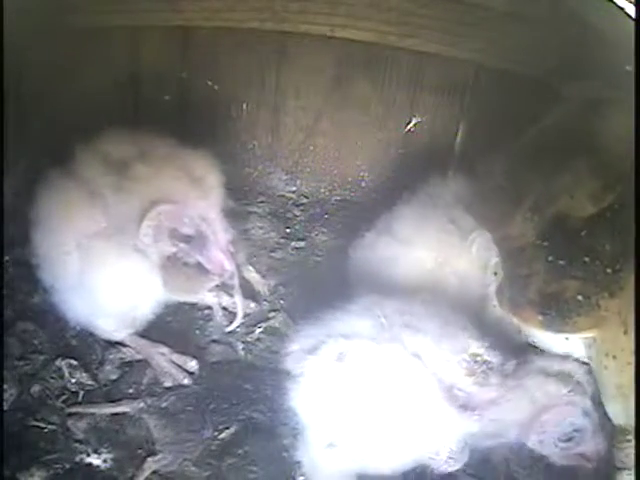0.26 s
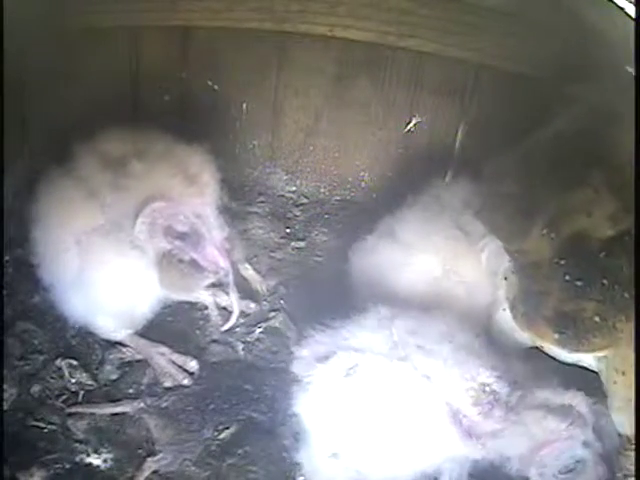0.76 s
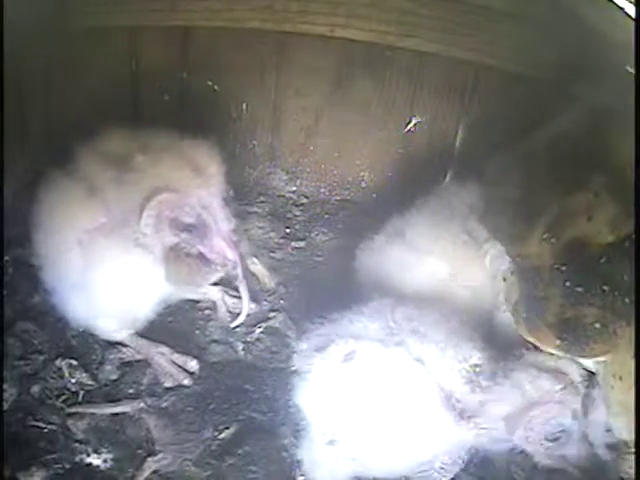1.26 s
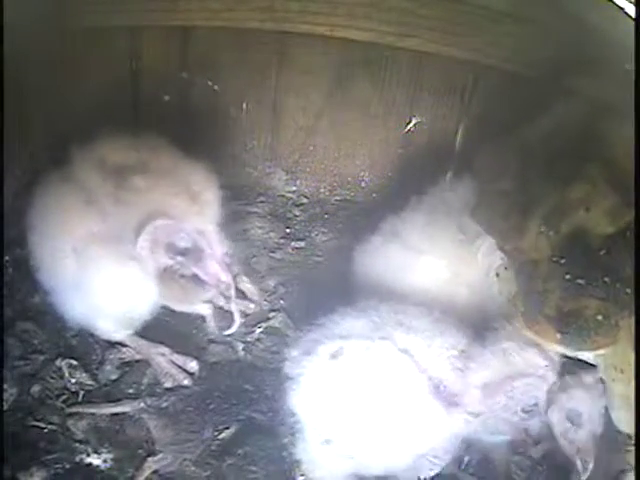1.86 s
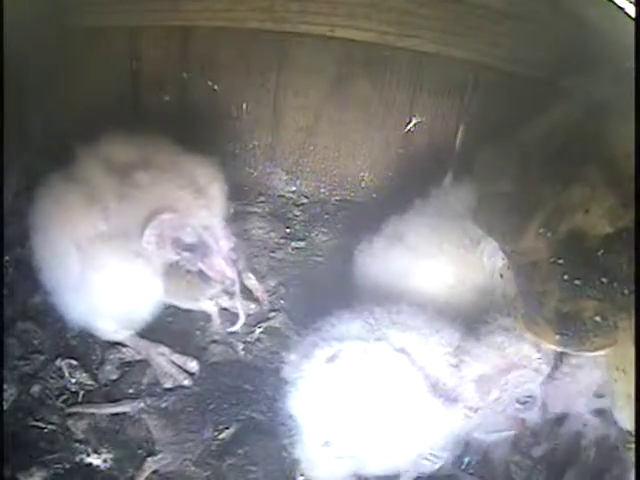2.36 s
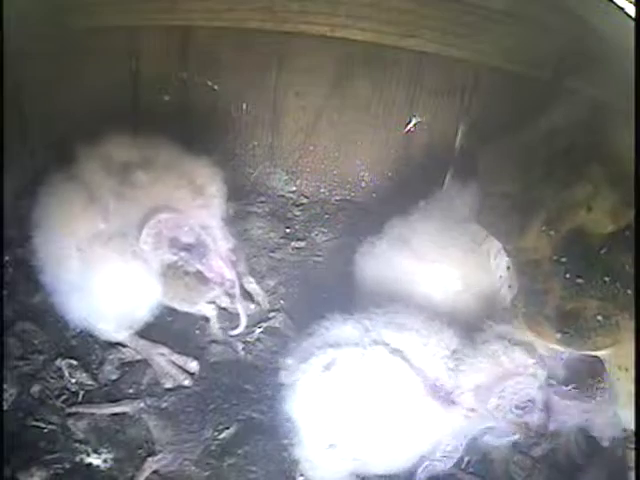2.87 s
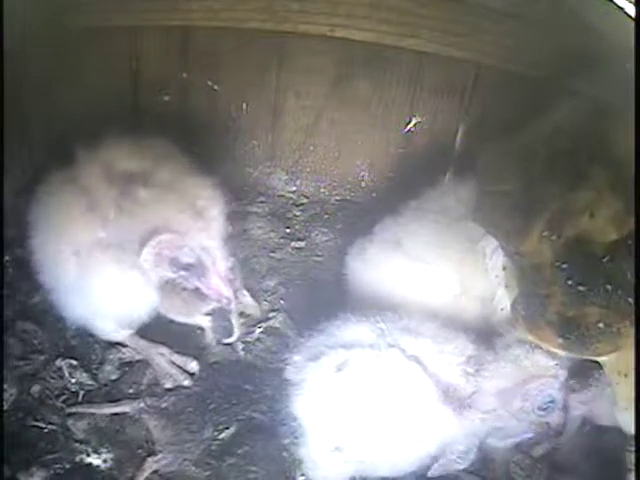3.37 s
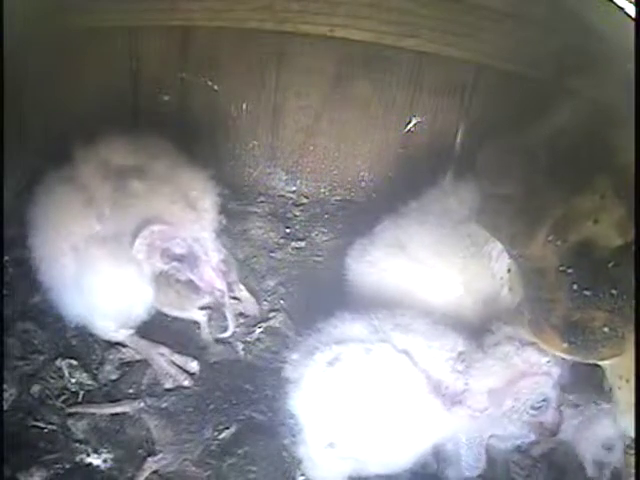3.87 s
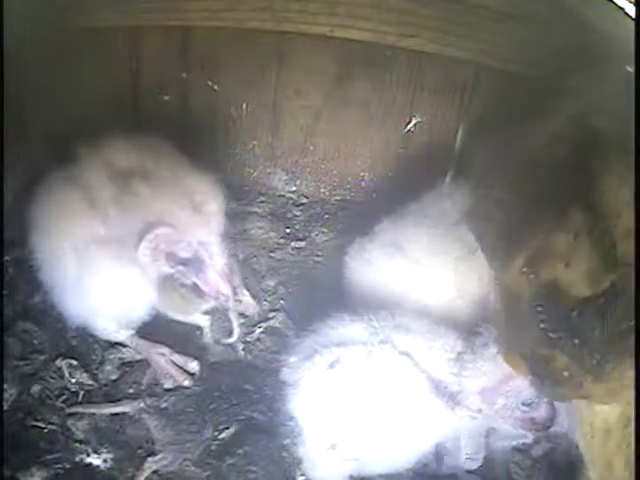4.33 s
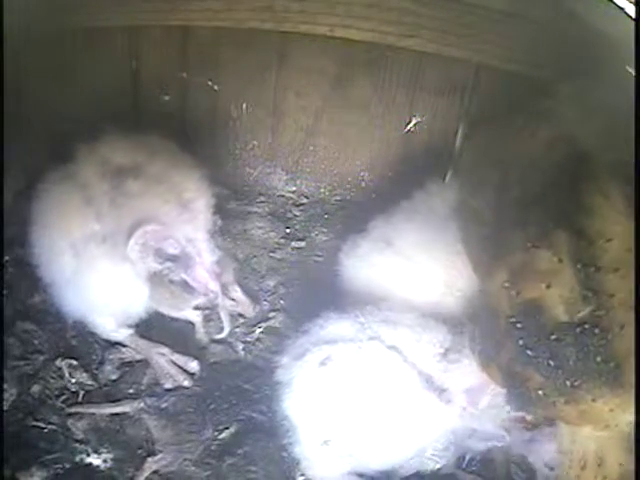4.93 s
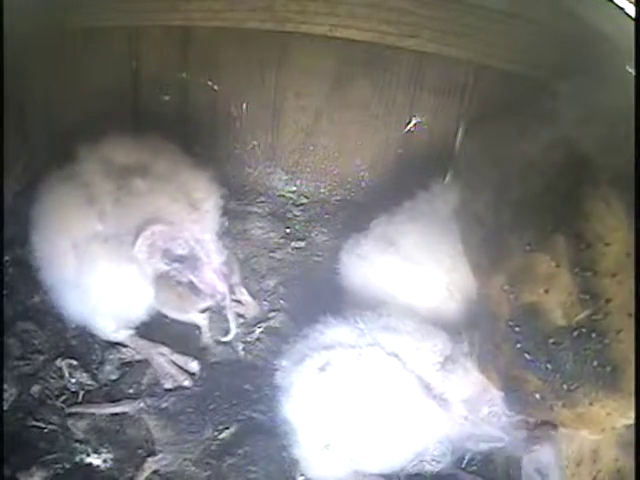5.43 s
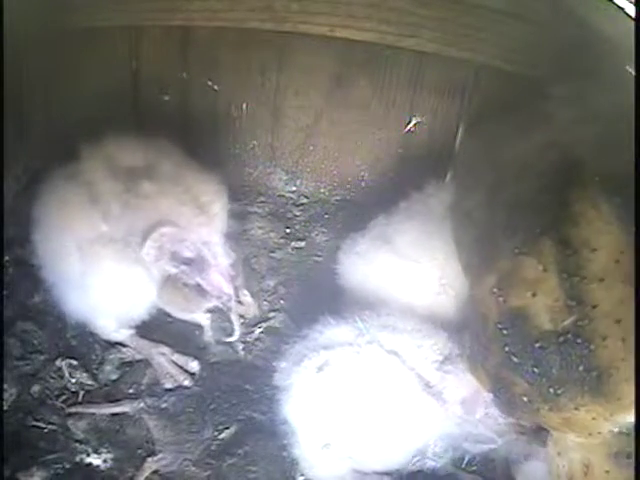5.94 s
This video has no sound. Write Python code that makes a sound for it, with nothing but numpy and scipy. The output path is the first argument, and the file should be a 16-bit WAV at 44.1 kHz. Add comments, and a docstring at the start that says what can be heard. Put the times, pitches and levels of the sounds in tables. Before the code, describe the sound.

A close, lo-fi microphone in a small wooden nest box, heard almost entirely on the left, with only very faint hum and hiss on the right. A steady 60-per-second electrical buzz, thin whine and faint box air continue throughout. A young owl begs with rasping, snore-like hisses, bright around 4.5 kHz with a throaty layer near 2 kHz. They run about 0.3-0.75, 1.1-1.55 and 1.95-2.4 seconds, swelling and then shutting with a short falling squeak. Small mouth pops click at 1.8, 1.95 and 2.7. The loudest, lower hiss lasts from 2.7 to 3.2, with a soft floor thump at 2.9. A scarcely audible puff comes at 3.35 and a pop at 3.4. Further hisses follow at 3.6-3.95, 4.45-4.9 and a thinner one at 5.25-5.65, ending in a clearer squeak. Another starts at 6.03, still rising when the sound ends.

```python
"""Owlet begging in a nest box

An owlet begs with long hisses: noise shaped by windpipe, beak and box resonances. Its half-closed windpipe
squeaks, in gliding sines, as it opens and shuts. Mouth pops and floor bumps are short decaying tones.
A camera's picture signal buzzes in the microphone lead as a train of dips, beside a faint whine and box air.
All this is on the left; the open right input holds faint hum, pulses and hiss, with a trace of the left.
"""
import sys
import numpy as np
from scipy import signal
from scipy.fft import rfft, irfft, next_fast_len
from scipy.io import wavfile
from scipy.ndimage import uniform_filter1d, map_coordinates

SR = 44100
rng = np.random.default_rng(int(sys.argv[2]) if len(sys.argv) > 2 else 0)


def voltage_ratio(decibels):
    """Convert decibels (scalar or array-like) to amplitude ratios, 20 dB per decade."""
    exponent = np.asarray(decibels, float) / 20
    return 10 ** exponent


def persist_wave(psi):
    """Save psi, clipped to +-1, as 16-bit WAV."""
    counts = np.round(np.clip(psi, -1, 1) * 32767).astype(np.int16)
    wavfile.write(sys.argv[1], SR, np.atleast_2d(counts).T)


N = 273420
T = np.arange(N) / SR  # s

# the begging hisses, one list each: (time [s], effort as level of the main mode [dB],
# narrowing as throat mode over main mode [dB], throat mode [Hz], beak opening as treble over main mode [dB])
HISS_PATHS = [
    [(0.295, -54, -7, 1770, -15), (0.307, -62, 8.5, 1960, 3), (0.355, -33.5, -15.5, 1950, -5.5),
     (0.487, -25.5, -15.5, 2000, -6), (0.667, -26, -11.5, 1930, -5.5), (0.699, -27.5, -10, 2220, -8),
     (0.733, -40, 3.5, 2140, -2), (0.765, -58, 3, 1810, 8.5)],
    [(1.127, -56, 3, 1970, -7.5), (1.167, -41.5, -11, 1960, 2), (1.267, -31.5, -13, 1970, -4),
     (1.409, -25, -10.5, 2070, -6.5), (1.485, -27, -4, 1980, -8.5), (1.501, -29.5, -8.5, 2110, -6.5),
     (1.523, -39, 6, 2180, -4.5), (1.553, -48, 13, 1980, -10.5)],
    [(1.948, -59.5, 17, 1860, -5), (2.004, -36.5, -5, 1990, -2.5), (2.078, -35.5, 0.5, 1920, -1),
     (2.152, -29.5, -2.5, 2120, -5.5), (2.262, -27.5, -2.5, 1990, -2.5), (2.326, -28.5, -2, 2120, -13),
     (2.372, -39, 3.5, 2050, -10.5), (2.398, -59.5, 9, 1850, -8)],
    [(2.722, -45, 6, 2000, -0.5), (2.732, -42, -8.5, 2140, -5.5), (2.856, -29.5, -16.5, 1620, -5.5),
     (2.964, -19.5, -15, 1600, -14), (3.092, -21, -17, 1690, -11), (3.164, -33, -8.5, 1730, -7.5),
     (3.21, -44, 4.5, 1820, -6), (3.222, -56, 13, 1690, 5)],
    [(3.325, -74.5, 17, 2060, -8.5), (3.335, -70, 6, 2040, -2), (3.343, -73.5, 12, 2000, 3.5),
     (3.353, -66, -2, 1910, -0.5), (3.365, -72, 8, 1840, -2), (3.37, -89, 12, 1830, -0.5)],
    [(3.577, -65, 9, 2080, -9.5), (3.587, -65.5, 4, 2120, -0.5), (3.631, -42, -6.5, 2000, 1),
     (3.663, -37.5, -12, 1950, -1), (3.819, -31, -3.5, 2130, -3), (3.827, -27.5, -8, 2190, -5),
     (3.915, -31, -0.5, 2300, -5), (3.975, -62.5, 24.5, 1960, -1.5)],
    [(4.44, -60, -16, 2060, 18), (4.468, -48, -5, 2110, -7.5), (4.51, -50.5, 7, 1810, -3.5),
     (4.674, -32.5, -7.5, 1880, -1), (4.73, -30, 0.5, 2150, -13.5), (4.822, -35, -1.5, 2130, -6.5),
     (4.88, -50, 16, 1960, -8.5), (4.885, -71.5, 24.5, 1890, -4)],
    [(5.242, -75, 26.5, 2060, -2.5), (5.286, -47.5, 9, 2030, 6.5), (5.354, -38, -0.5, 2100, 3),
     (5.444, -33, -1, 2100, 0.5), (5.508, -34, -0.5, 2110, 5), (5.598, -30, -4.5, 2200, -4),
     (5.618, -42, 11, 2220, 0.5), (5.645, -55.5, 16, 2000, -2.5)],
    [(6.03, -72, 5, 2100, 16.5), (6.042, -48.5, -26, 2050, -1.5), (6.048, -44, 1, 2050, -15),
     (6.054, -54.5, 6.5, 2010, -1), (6.092, -45.5, -3.5, 2000, 2), (6.134, -42, 0, 1850, 5.5),
     (6.19, -35.5, -3, 1960, -5), (6.2, -31.5, -4, 1960, -0.5)],
]
# further tone colour, one row per hiss: (shoulder below the main mode [dB], shoulder above it [dB],
# turn away from the wall [about 0-1], lift of the box's low mode [dB], top octave [dB])
HISS_COLOURS = [(-8, -12, 0, 0, -3.5), (-11.5, -7, -.1, -0.5, -0.5), (-1, -15, -.1, 3.5, -2),
                (-7, -33.5, 0.96, 2.5, -5), (-2, -12, 0.3, 9, -0.5), (-6.5, -5, 0, 3, -3),
                (-10.5, -16, 0.14, 7, 0), (-2.5, -11, 0.35, 6, -2.5), (-29, -17.5, 0.2, 5.5, -2)]
# squeaks as the windpipe shuts: (time [s], length [s], first pitch [Hz], level [dB], step per overtone [dB])
SHUTTING_SQUEAKS = [(0.746, 0.019, 2120, -34.5, -13.5), (1.551, .013, 1946, -36, -18),
                    (2.38, 0.014, 2050, -32, -9), (3.204, 0.017, 2026, -35.5, -28),
                    (3.959, 0.031, 2160, -32.5, -26), (4.873, 0.0202, 2070, -37, -29),
                    (5.632, 0.011, 2250, -25.5, -23)]


def unit(x):
    """Scale to rms 1."""
    return x / np.sqrt(np.mean(np.abs(x) ** 2) + 1e-20)


def along(points, hz):
    """Turn (frequency [Hz], level [dB]) points into gains, interpolated on a log frequency axis."""
    point_hz, point_db = np.transpose(points)
    return voltage_ratio(np.interp(np.log(hz + 1), np.log(point_hz + 1), point_db))


def wobble(rate):
    """A smooth random curve through `rate` knots a second."""
    knots = rng.standard_normal(int(N * rate / SR) + 4)
    return map_coordinates(knots, [T * rate])


def filtered(x, response):
    """Multiply the spectrum of x by a response of frequency."""
    size = next_fast_len(N + SR // 4)
    spectrum = rfft(x, size) * response(np.fft.rfftfreq(size, 1 / SR))
    return irfft(spectrum, size)[:N]


def noise(spectrum):
    """Steady noise of rms 1 with the given spectrum."""
    return unit(filtered(rng.standard_normal(N), lambda f: along(spectrum, f)))


def mode(f, hz, width):
    """Complex response of one resonance."""
    return 1j * f * width / (hz * hz - f * f + 1j * f * width)


def bell(f, hz, width):
    """A bell curve of height 1 over frequency."""
    return np.exp(-.5 * ((f - hz) / width) ** 2)


def power(response):
    """Power of a response, scaled to a mean of 1 over frequency."""
    squared = np.abs(response) ** 2
    return squared / np.mean(squared, axis=0)


def fixed_modes(f, modes):
    """Power of resonances that sum with alternating sign, as neighbouring modes of a cavity can."""
    total = sum((-1) ** k * voltage_ratio(db) * mode(f, hz, width) for k, (hz, width, db) in enumerate(modes))
    return power(total ** 1.174)


def hiss_progress(t):
    """Index of the current hiss, and how far it has run from 0 to 1."""
    starts = [path[0][0] - .02 for path in HISS_PATHS]
    which = np.clip(np.searchsorted(starts, t) - 1, 0, None)
    first, last = np.transpose([(path[0][0], path[-1][0]) for path in HISS_PATHS])[:, which]
    return which, np.clip((t - first) / (last - first), 0, 1)


def hiss_colour(f, t, which, progress):
    """Power spectrum of the rushing air through moving windpipe modes and fixed resonances; main mode in Hz."""
    # voice, one row per hiss: (main mode [Hz], its width [Hz],
    # then levels against it: bottom [dB], third mode [dB], top [dB])
    voices = [(4560, 180, -8.5, -5, -5), (4537, 350, -8, -1.5, -6), (4650, 230, -10.5, -4.5, -3.5),
              (4620, 270, -10, 1, -14), (4550, 280, -19, -1, -22), (4504, 390, -11, -1.5, -5),
              (4520, 400, -12, -2.5, -5), (4260, 560, -11, -1, -6.5), (4560, 290, -10, -2.5, -5.5)]
    # fixed resonances that the hiss excites, bottom, third and top: (frequency [Hz], width [Hz], level [dB])
    bottom_modes = [(620, 350, -7), (1080, 250, -1), (1370, 200, 0)]
    third_modes = [(5900, 120, -8), (6714, 460, 4)]
    top_modes = [(8145, 220, 4), (9370, 487, 0.5), (10080, 290, 5), (11500, 990, -4.5)]
    # broad rush between the modes: (frequency [Hz], relative level [dB])
    rush_spectrum = [(300, -47.5), (500, -12.5), (2000, -2), (3400, 1.5), (5500, -3.5), (8000, -2.5),
                     (11000, -34), (12500, -34), (14000, -34), (15700, -18.5)]
    reference_effort_db = -30
    rush_db, rush_growth = 4, .25  # level against the top modes; dB gained per dB of effort
    sag_hz, wander_hz = 120, 45  # the main mode sinks through a hiss and wanders
    # how bottom, third and top follow: dB per dB of (narrowing, effort, beak opening)
    laws = [(0.23, -0.57, .1), (.05, -.05, 0.97), (-0.015, 0.085, 1)]

    s, main_db, *columns = np.concatenate(HISS_PATHS).T
    effort_db = np.interp(t, s, main_db - reference_effort_db)
    throat_db, throat_hz, beak_db = [np.interp(t, s, column) for column in columns]
    main_hz, width_hz, *layers_db = np.transpose(voices)[:, which]
    bottom_db, third_db, top_db = [
        db + a * throat_db + b * effort_db + c * beak_db for db, (a, b, c) in zip(layers_db, laws)]
    below_db, above_db = np.transpose(HISS_COLOURS)[:2, which]
    main_hz = main_hz - sag_hz * (progress - .5) + wander_hz * np.interp(t, T, wobble(12))

    # powers of the modes steepen their skirts
    main = power(mode(f, main_hz, width_hz) ** 2.5)
    throat = voltage_ratio(throat_db) ** 2 * power(mode(f, throat_hz, 1100) ** 3.2)
    below = voltage_ratio(below_db) ** 2 * power(mode(f, 4206, 600) ** 1.1)
    above = voltage_ratio(above_db) ** 2 * power(mode(f, 5035, 340) ** 5.4)
    bottom = voltage_ratio(bottom_db) ** 2 * fixed_modes(f, bottom_modes)
    third = voltage_ratio(third_db) ** 2 * fixed_modes(f, third_modes)
    rush = voltage_ratio(rush_db + rush_growth * effort_db) ** 2 * power(along(rush_spectrum, f))
    top = voltage_ratio(top_db) ** 2 * (fixed_modes(f, top_modes) + rush)
    return main + throat + below + above + bottom + third + top, main_hz


def fine_colour_db(f, which, progress, main_hz):
    """Fixed peaks and dips, wall echoes, tone colour of each hiss and a drifting fine ripple, in dB."""
    # fixed peaks and dips of the hiss spectrum, with weak treble around 13 kHz:
    # (frequency [Hz], width [Hz], level [dB])
    fixed_bands = [(1950, 350, 0.5), (2582, 43, 4.5), (3550, 40, 4), (4763, 14, 7), (2153, 46, -11),
                   (8520, 160, 0.5), (9400, 140, -1), (10740, 150, -5), (13300, 700, -7.5)]
    # bands where a wall echo meets the direct sound, mostly cancelling it:
    # (frequency [Hz], width [Hz], level facing the wall [dB], level turned away [dB])
    echo_bands = [(876, 39, -10, -19.5), (1560, 77, -5.5, 1.5), (3200, 120, 2.5, -15.5),
                  (5760, 190, 1, -6.5), (7260, 210, 0, -12.5)]
    hollow_hz, hollow_width_hz, hollow_db = 3347, 330, -6  # gap between throat and main mode

    turn, body_db, octave_db = np.transpose(HISS_COLOURS)[2:, which]
    fixed = sum(db * bell(f, hz, width) for hz, width, db in fixed_bands)
    echoes = sum((facing + (away - facing) * turn) * bell(f, hz, width)
                 for hz, width, facing, away in echo_bands)
    hollow = hollow_db * (1 - progress) ** 1.9 * bell(f, hollow_hz, hollow_width_hz)  # deepest at the start
    body = body_db * bell(f, 650, 130)
    octave = octave_db * np.clip(f / 3000 - 3, 0, 1)  # comes in from 9 to 12 kHz
    # fine peaks and dips that drift over time
    ripple = rng.standard_normal((len(f), len(main_hz)))
    ripple = uniform_filter1d(ripple, size=2, axis=0)
    ripple = unit(uniform_filter1d(ripple, size=70, axis=1))
    ripple_share = 1 - .8 * bell(f, main_hz, 350)  # the fine ripple is shallower around the main mode
    return fixed + echoes + hollow + body + octave + 3.1 * ripple_share * ripple


def hiss_level_db(t, progress):
    """Effort sets the loudness while the folds flutter, flap and briefly close."""
    # brief closures of the windpipe near the start or end of a hiss: (time [s], length [s], level [dB])
    closures = [(.742, 0.0037, -8), (1.534, 0.003, -8), (1.542, 0.0029, -19.5), (2.377, 0.0031, -15.5),
                (3.19, 0.0046, -10), (4.448, 0.026, -9), (4.473, 0.0051, -8), (4.837, 0.005, -14.5),
                (4.860, 0.0085, -21), (6.054, 0.015, -8.5)]
    flap_hz, flap_db = 170, 3  # the tiring folds flap: mean rate, depth reached at the end of a hiss
    shut_db = -5  # the air thins while the shutting folds sing

    s, main_db = np.concatenate(HISS_PATHS).T[:2]
    level_db = np.interp(T, s, main_db) - .8 + 0.13 * wobble(140) + 0.89 * wobble(30)
    flap = np.sin(2 * np.pi * np.cumsum(flap_hz * (1 + .2 * wobble(25))) / SR)
    level_db = level_db + flap_db * np.interp(T, t, progress) ** 4 * flap
    thinnings = [(start + length / 2, length, shut_db) for start, length, *_ in SHUTTING_SQUEAKS]
    for centre, length, db in closures + thinnings:
        level_db = level_db + db * np.exp(-((T - centre) / length * 2) ** 4)
    return level_db


def hiss():
    """Turbulent air is broadband noise, coloured by windpipe, beak and box and driven by the bird's effort."""
    f, t, frames = signal.stft(rng.standard_normal(N), SR, nperseg=512, noverlap=384)
    f = f[:, None]
    frames = unit(frames)
    which, progress = hiss_progress(t)
    colour, main_hz = hiss_colour(f, t, which, progress)
    shape = np.sqrt(colour) * voltage_ratio(fine_colour_db(f, which, progress, main_hz))
    air = signal.istft(frames * shape, SR, nperseg=512, noverlap=384)[1][:N]
    air = air / np.std(signal.istft(frames, SR, nperseg=512, noverlap=384)[1])
    gate = 0
    for path in HISS_PATHS:
        rise = (T - path[0][0]) / .0015
        fall = (path[-1][0] - T) / 0.012 + .5
        gate = gate + np.clip(np.minimum(rise, fall), 0, 1)
    return air * voltage_ratio(hiss_level_db(t, progress)) * gate


def squeaks():
    """The narrowing folds sing a short falling note with overtones."""
    # squeaks as the windpipe opens:
    # (time [s], length [s], first pitch [Hz], level [dB], step per overtone [dB])
    openings = [(.287, .011, 4860, -48.5, -13), (1.114, 0.016, 4700, -57, -30),
                (1.931, 0.017, 5100, -57.5, 0), (3.565, .011, 4550, -47, -34),
                (4.457, .022, 4570, -44.5, -12), (5.224, 0.018, 5140, -59, 1),
                (6.019, 0.0098, 4940, -58, 2.5), (6.041, 0.011, 4950, -42, -8)]
    open_hz, shut_share = 4250, 0.81  # last pitch when opening; last over first pitch when shutting
    open_bend, shut_bend = 2.2, .9  # power of time in the glide: a late fall, an almost even fall

    notes = [(*row, open_hz, open_bend) for row in openings]
    notes += [(*row, row[2] * shut_share, shut_bend) for row in SHUTTING_SQUEAKS]
    out = np.zeros(N + SR)
    for s, length, first_hz, db, slope_db, last_hz, bend in notes:
        u = np.linspace(0, 1, round(length * SR))
        phase = 2 * np.pi * np.cumsum(first_hz + (last_hz - first_hz) * u ** bend) / SR
        note = 0
        for k in range(5):
            if (k + 1) * first_hz < 11000:
                note = note + voltage_ratio(k * slope_db) * np.sin((k + 1) * phase)
        out[round(s * SR):][:len(u)] += voltage_ratio(db) * np.sin(np.pi * u) ** .6 * note
    return out[:N]


def knocks(events, cycles, crack):
    """Each event is a tone with a little noise, swelling to its peak in `cycles` periods and then decaying."""
    out, t = np.zeros(N + SR), T[:SR // 8]
    for s, db, hz in events:
        u = t * hz / cycles
        envelope = np.e * u * np.exp(-u)
        ring = np.sin(2 * np.pi * hz * t) + crack * rng.standard_normal(len(t))
        out[round(s * SR):][:len(t)] += voltage_ratio(db) * envelope * ring
    return out[:N]


def mouth_pops():
    """The mouth pops as a very short ring of its cavity."""
    # (time [s], envelope peak [dB], frequency [Hz])
    pops = [(1.773, -44.5, 1560), (1.949, -29, 1885), (2.7222, -34.5, 2080), (3.4251, -35, 2027),
            (3.5772, -36.5, 2110), (5.242, -37, 2150)]
    return knocks(pops, cycles=0.96, crack=0.09)


def floor_bumps():
    """Feet bump the box floor, which gives a low, heavily damped ring."""
    # (time [s], envelope peak [dB], frequency [Hz])
    bumps = [(1.49, -47, 145), (1.79, -45.5, 120), (2.171, -43.5, 130), (2.656, -50, 122),
             (2.912, -25.5, 188.4), (2.915, -37.5, 396), (2.94, -36.5, 202), (3.33, -51, 304)]
    return knocks(bumps, cycles=0.71, crack=.02)


def buzz():
    """One dip per picture field, entered in two steps, with a spit near each edge; the picture adds a swell."""
    field_hz, line_hz = 59.94, 15734
    pulse_db, pulse_s, narrowing = -41, 0.0025, 0.00015  # blanking pulse; s of width lost per s

    fields = (T - .0106) * field_hz + .5
    count = np.floor(fields).astype(int)
    away = (fields % 1 - .5) / field_hz  # s from the middle of the nearest pulse
    jitter = .00008 * rng.standard_normal(count.max() + 2)[count]
    half = (pulse_s - narrowing * T) / 2 + jitter
    first_step = 0.33 * np.tanh((away + half + 0.0011) / 0.00062)
    second_step = 0.8 * np.tanh((away + half) / 0.0003)
    rise = np.tanh((away - half) / 0.00025)
    odd = 1 + 0.071 * (-1.) ** count  # odd and even fields differ a little
    swell = 0.15 * np.cos(2 * np.pi * (away * field_hz - .26))
    dip = voltage_ratio(pulse_db) * (odd * (rise - first_step - second_step) / 2 + swell)

    spit = voltage_ratio(-50.5) * np.exp(-((away + half + 0.00053) / .0001) ** 2)
    spit = spit + voltage_ratio(-61.5) * np.exp(-((away - half) / 0.00016) ** 2)
    crackle = np.sin(2 * np.pi * 5000 * away) + 0.2 * rng.standard_normal(N)
    edges = filtered(spit * crackle, lambda f: f / (f + 1500))

    line_tone = voltage_ratio(-66) * np.sin(2 * np.pi * line_hz * T)
    half_line_tone = voltage_ratio(-84.5) * (1 + .25 * wobble(45)) * np.sin(np.pi * line_hz * T)
    # a high-pass at 8 Hz takes the lowest frequencies from the dips
    return filtered(dip, lambda f: 1j * f / (8 + 1j * f)) + edges + line_tone + half_line_tone


def whine():
    """Three unsteady partials of one faint tone that drifts in pitch."""
    # middle partial: (time [s], pitch [Hz], level [dB])
    drift = [(0, 1122, -70.5), (.3, 1075, -66), (0.802, 1040, -67), (1.099, 1092, -72), (1.7, 1070, -70),
             (2.499, 1006, -67.5), (3.4, 960, -81), (4, 953, -66), (4.2, 972, -68.5), (4.45, 1002, -68.5),
             (5.2, 1001, -67.5), (5.7, 990, -69), (6.2, 1070, -74)]
    s, hz, db = np.transpose(drift)
    phase = 2 * np.pi * np.cumsum(np.interp(T, s, hz) * (1 + .003 * wobble(15))) / SR
    out = 0
    for multiple, partial_db in [(4 / 6, -3), (1, 0), (7 / 6, -2)]:
        level_db = np.interp(T, s, db) + partial_db + 1.4 * wobble(8)
        out = out + voltage_ratio(level_db) * np.sin(multiple * phase)
    return out


def box_air():
    """Air in the box and preamplifier hiss: shaped noise whose level wanders slightly."""
    # (frequency [Hz], relative level [dB])
    air_spectrum = [(15, -42.5), (25, -6), (100, -4), (300, -18), (462, -13.5), (952, -11), (1240, -16.5),
                    (1390, -12.5), (2150, -18), (2600, -25.5), (3700, -31), (4380, -28.5), (5280, -39.5),
                    (11500, -35.5), (15000, -61)]
    return voltage_ratio(-60.0 + 0.22 * wobble(13.0)) * noise(air_spectrum)


def open_input():
    """Mains hum, a slower pulse train built from harmonics, and hiss on the unconnected channel."""
    # hiss: (frequency [Hz], relative level [dB])
    hiss_spectrum = [(30, 1), (300, -4.5), (800, -15), (8000, -16.5), (10400, -21), (15000, -21),
                     (20000, -25)]
    hum = voltage_ratio(-78) * np.cos(2 * np.pi * 60 * T)
    pulses = sum(voltage_ratio(-97.5 - .09 * k * k) * np.sin(2 * np.pi * k * 52.7 * T) for k in range(2, 14))
    return hum + pulses + voltage_ratio(-87) * noise(hiss_spectrum)


def scene():
    """Bird, box and lead noises share the one microphone channel; the other input is open."""
    bird = hiss() + squeaks() + mouth_pops()
    box = floor_bumps() + box_air()
    microphone = voltage_ratio(5.5) * (bird + box + buzz() + whine())  # this gain lifts every left-hand layer
    return np.array([microphone, open_input()])


def record(dry):
    """Cut the left at 15.95 kHz, and above 13.5 kHz unless it is loud; leak a trace of it into the right."""
    left = filtered(dry[0], lambda f: f < 15950)
    loudness = np.sqrt(np.abs(uniform_filter1d(left ** 2, size=900)))  # rms over about 20 ms
    treble = filtered(left, lambda f: f > 13500)
    left = left - treble * np.clip(2 - loudness / voltage_ratio(-37.0), 0, 1)
    return np.array([left, dry[1] + voltage_ratio(-76) * left])


dry = scene()
out = record(dry)
persist_wave(out)
```